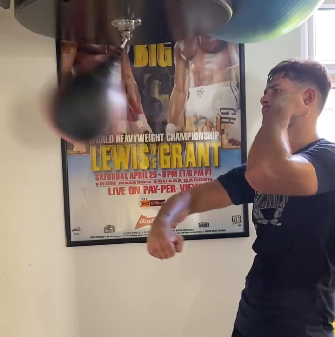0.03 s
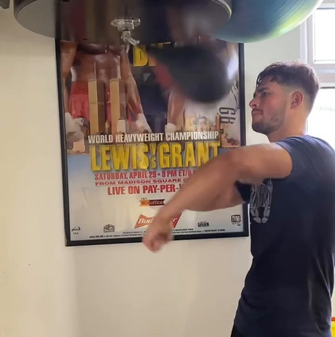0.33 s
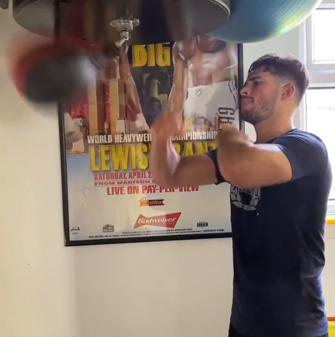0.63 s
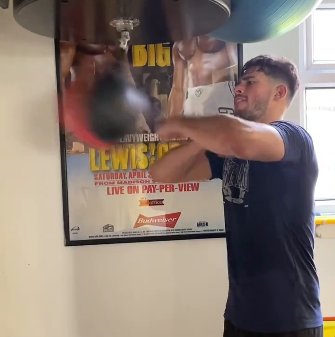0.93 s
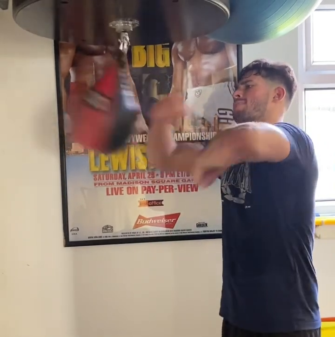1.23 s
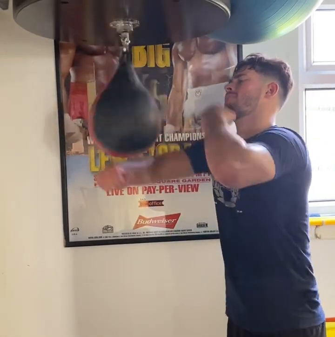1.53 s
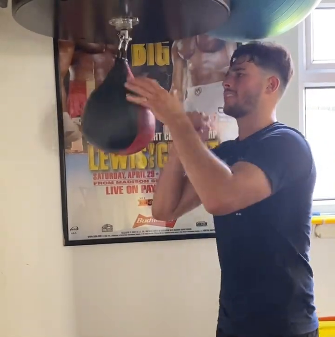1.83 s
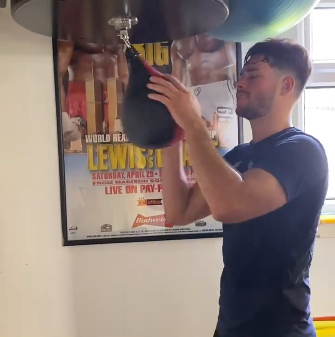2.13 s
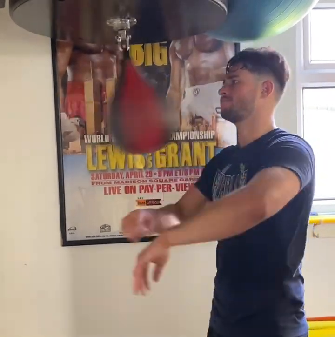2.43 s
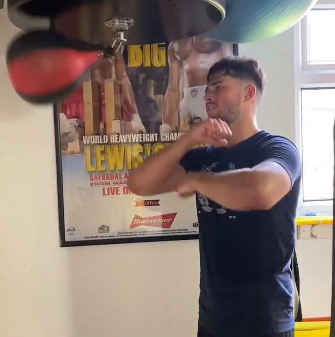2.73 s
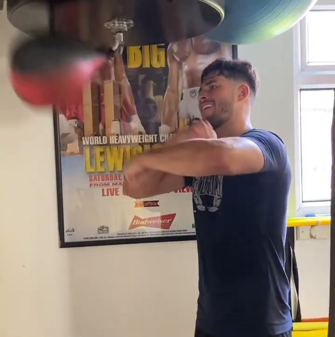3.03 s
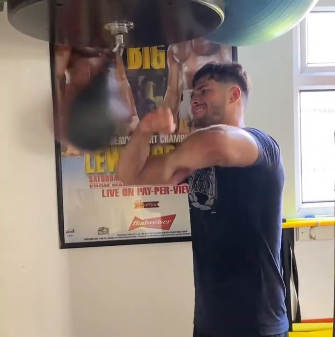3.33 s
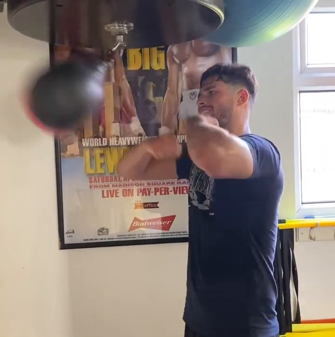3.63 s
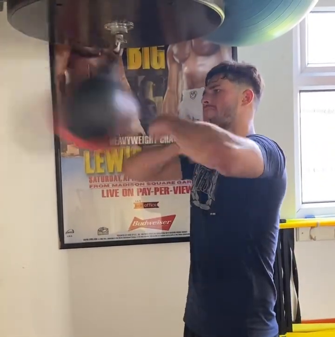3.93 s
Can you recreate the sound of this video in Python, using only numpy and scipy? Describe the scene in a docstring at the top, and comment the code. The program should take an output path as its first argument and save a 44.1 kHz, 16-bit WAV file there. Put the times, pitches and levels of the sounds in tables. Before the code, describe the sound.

A leather speed bag is drummed rapidly, each slap booming on its wooden platform while the metal swivel clatters. Hands steady it with soft thuds, then the drumming resumes, heard up close in a small gym.

```python
"""A leather speed bag is drummed against its wall-mounted platform, steadied by hand, then drummed again.
Each slap is a crack of leather, a woody knock and a thud that sets the board booming. Loose fittings
buzz with every swing of the board; between slaps the swivel clatters and squawks and its shackle rings.
A close pair of microphones hears it all in a small gym."""
import sys
import numpy as np
from scipy import signal
from scipy.fft import rfft, irfft, next_fast_len
from scipy.io import wavfile
from scipy.ndimage import uniform_filter1d

SR = 44100
rng = np.random.default_rng(int(sys.argv[2]) if len(sys.argv) > 2 else 0)


def output_pcm(signal):
    """Save a mono or channel-first signal as 16-bit PCM at the path in sys.argv[1].

    Samples are clipped to [-1, 1] before scaling.
    """
    pcm = np.clip(np.atleast_2d(signal).T, -1, 1) * 32767
    wavfile.write(sys.argv[1], SR, np.round(pcm).astype(np.int16))


N = 176400
TIME = np.arange(N) / SR
FFT_SIZE = next_fast_len(N + SR)
HZ = np.arange(FFT_SIZE // 2 + 1) * SR / FFT_SIZE
MID_ONLY = [[1], [0]]   # two-stream sounds are mid and side until they reach the microphones


def from_db(db):
    """Decibels to gain."""
    return 10 ** (np.asarray(db) / 20)


def unit_rms(x):
    """Scale to an rms of one."""
    return x / np.sqrt(np.mean(x ** 2) + 1e-20)


def at_hz(curve, hz):
    """Read a curve on a log-frequency axis."""
    freqs, values = np.transpose(curve)
    return np.interp(np.log(hz + 1e-9), np.log(freqs), values)


def fader(curve):
    """Gain over time, riding a curve of levels in dB."""
    return from_db(np.interp(TIME, *np.transpose(curve)))


def filtered(x, response):
    """Apply a frequency response."""
    return irfft(rfft(x, FFT_SIZE) * response, FFT_SIZE)[..., :N]


def colour(x, eq):
    """EQ that keeps the power of white noise and rolls off below its first point."""
    gain = from_db(at_hz(eq, HZ)) * np.minimum(HZ / eq[0][0], 1) ** 2
    return filtered(x, unit_rms(gain))


def grains(spread_db):
    """Gritty noise: dense tiny contacts of uneven size, as two streams."""
    sizes = np.clip(rng.standard_normal(N // 32 + 1), -2, 2)
    gain = from_db(spread_db * np.repeat(sizes, 32)[:N])
    return unit_rms(rng.standard_normal((2, N)) * gain)


def bursts(starts_s, levels_db, attack_s, decay_s):
    """Envelope of a run of hits: each rises, then dies away."""
    power, t = np.zeros(N + SR), TIME[:SR // 5]
    for start_s, level_db, rise_s in np.broadcast(starts_s, levels_db, np.maximum(attack_s, 1e-4)):
        shape = np.minimum(t / rise_s, 1) * np.exp(-np.maximum(t - rise_s, 0) / decay_s)
        i = max(int(start_s * SR), 0)
        power[i:i + len(t)] += (from_db(level_db) * shape) ** 2
    return np.sqrt(power[:N])


def pushes(starts_s, levels_db, width_s):
    """Pulses of force, each with its level as area: the wider, the duller."""
    clicks = np.zeros(N + SR)
    clicks[np.maximum(starts_s * SR, 0).astype(int)] = from_db(levels_db)
    return filtered(clicks[:N], np.exp(-2 * (np.pi * HZ * width_s) ** 2))


def ring(force, modes):
    """Resonator bank: a unit click sets each mode ringing at its level."""
    out = 0
    for pitch_hz, level_db, t60_s in modes:
        radius = from_db(-60 / (t60_s * SR))
        pole_real = radius * np.cos(2 * np.pi * pitch_hz / SR)
        tone = signal.lfilter([1, -pole_real], [1, -2 * pole_real, radius ** 2], force + 1e-18)
        out = out + from_db(level_db) * tone
    return out


# Bright crack of the skin: freq_hz, gain_db
CRACK_EQ = [(800, -36), (2000, 5), (3500, 0.5), (5200, 3), (8000, -3), (11000, -3.5), (14000, -8),
            (16000, -31.5)]
# Sharp tick as the leather first touches: freq_hz, gain_db
SNAP_EQ = [(1000, -1), (3000, -32), (6000, 2.5), (10000, 5.5), (13000, -6), (16000, -10.5)]
# Woody midrange knock: freq_hz, gain_db
KNOCK_EQ = [(150, -13.5), (350, 5), (600, 0), (1000, 0.5), (1500, -0.5), (2300, -7), (3500, -10.5),
            (6000, -38), (16000, -55)]
# Leather hits on board or hand: start_s, crack_db, knock_db, thud_db, snap_over_crack_db
SLAPS = [(0.0034, -13.5, -24.5, -23.5, -16), (0.0835, -17.5, -24.5, -19, 14), (0.19, -11.5, -19.5, -17, 7),
         (0.25, -11.5, -20, -14, 14), (0.3574, -11, -23.5, -17, 18.5), (0.4948, -18.5, -25.5, -28, 15),
         (0.599, -15.5, -18, -12, -3), (0.6576, -9, -19, -14, 10), (0.7166, -16, -18.5, -22.5, 11),
         (0.7623, -7.5, -19.5, -10, 14), (0.8649, -10, -19, -12, 6), (0.9772, -11, -20.5, -10.5, 10.5),
         (1.073, -10.5, -17.5, -13.5, 11), (1.1365, -16.5, -19.5, -37, 14), (1.1922, -12, -20.5, -16, -1),
         (1.2967, -10.5, -21, -14, 7), (1.6794, -33.5, -37, -33, 8), (1.9951, -38, -35, -38.5, -9),
         (2.359, -16, -24.5, -16, 8), (2.5155, -20, -29.5, -22, 8), (2.7321, -27.5, -34.5, -28.5, 13.5),
         (2.8566, -25.5, -26, -23, 0), (2.9139, -15, -24, -18.5, 14.5), (3.0336, -10, -23.5, -12.5, 10),
         (3.1486, -10, -17.5, -13, 11), (3.269, -11, -19.5, -11.5, 10), (3.3347, -14.5, -17, -14, -5),
         (3.3865, -9, -17, -10, -7), (3.5065, -6.5, -19, -11.5, 1), (3.5721, -11, -17.5, -20, 6),
         (3.6204, -10.5, -16.5, -10, 13.5), (3.7468, -9, -21, -12.5, 6), (3.8093, -10, -19.5, -17, 11),
         (3.8598, -7.5, -18, -12.5, 5), (3.984, -11, -19.5, -17, 13)]


def leather():
    """The bag's skin snaps on, crackles as it flattens and knocks on the wood."""
    start_s, crack_db, knock_db, _, snap_over_crack_db = np.transpose(SLAPS)
    crack = bursts(start_s, crack_db - 6.5, attack_s=0.00031, decay_s=0.0099) * grains(spread_db=1)
    snap = pushes(start_s + 0.001, crack_db + snap_over_crack_db, width_s=0) * MID_ONLY
    knock = bursts(start_s, knock_db + 3.5, attack_s=0.003, decay_s=0.012) * grains(spread_db=0.5)
    return colour(crack, CRACK_EQ) + colour(snap, SNAP_EQ) + colour(knock, KNOCK_EQ)


# Booming modes of board and bag: pitch_hz, level_db, t60_s
BOARD_MODES = [(39.4, -23, 1), (60.4, -14, 0.72), (69.34, -7.5, 1), (94.3, -8.5, 0.24), (107, -9, .22),
               (139.3, -6, 0.25), (154.4, -7.5, 0.094), (204.6, -11, 0.11), (234.7, -9, 0.2),
               (258, -16, 0.069), (372.4, -17.5, 0.48), (436.6, -9.5, 0.54), (546, -17, 0.084)]
# Low punch under each slap: freq_hz, gain_db
PUNCH_EQ = [(110, -12), (170, 4.5), (250, 3.5), (400, -8.5), (600, -13.5), (1200, -54)]
# Deep rumble of the swaying platform: freq_hz, gain_db
RUMBLE_EQ = [(34, -37), (41, 1), (48, -4), (60, -1), (70, 4), (80, 3.5), (100, 1), (120, -4.5), (145, -5.5),
             (190, -23), (300, -19.5), (600, -75)]
# How hard the board sways, the fader for its rumble and hum: time_s, level_db
SWAY_LEVELS = [(0.0, -3.5), (0.02, -25), (0.18, -16.5), (0.2, -12), (0.48, -27.5), (0.72, -10),
               (1.07, -18.5), (1.16, -11.5), (1.19, -24), (1.32, -18.5), (1.37, -38), (1.96, -51),
               (2.02, -30), (2.27, -74), (2.38, -21.5), (2.78, -46), (2.95, -18), (4.0, -12.5)]


def board():
    """Thuds of the bag and bumps of the swivel set the platform booming; it rumbles as it sways."""
    slap_s, _, _, thud_db, _ = np.transpose(SLAPS)
    clatter_s, _, _, bump_db, _ = np.transpose(CLATTERS)
    load_lag_s = 0.01124   # the bag flattens before the board takes the load
    thuds = pushes(slap_s + load_lag_s, thud_db + 2, width_s=0.0007)
    bumps = pushes(clatter_s + 0.0045, bump_db - 8.5, width_s=0.00086)
    punch_envelope = bursts(slap_s + 0.00773, thud_db - 3, attack_s=0.002, decay_s=0.0079)
    punch = colour(punch_envelope * rng.standard_normal(N), PUNCH_EQ)
    rumble = colour(rng.standard_normal(N), RUMBLE_EQ)
    even_rumble = rumble / np.sqrt(uniform_filter1d(rumble ** 2, size=3000))
    return from_db(-6) * fader(SWAY_LEVELS) * even_rumble + punch - ring(thuds + bumps, BOARD_MODES)


def board_hum(pitch_hz=69.2, wander_hz=2.03):
    """The board's main mode hums on under the drumming, drifting in pitch and following the sway."""
    drift = np.interp(TIME, np.linspace(0, N / SR, 60), rng.standard_normal(60))
    phase = 2 * np.pi * np.cumsum(pitch_hz + wander_hz * drift) / SR
    return from_db(-6.5) * fader(SWAY_LEVELS) * np.sqrt(2) * np.sin(phase)


# Buzz of the loose fittings: freq_hz, gain_db
RATTLE_EQ = [(150, 15.5), (400, 13.5), (700, 8), (1300, 1), (2200, 0.5), (4000, -6), (5300, -18),
             (7500, -24), (11000, -11), (16000, -49)]
# Midrange clack of frame and swivel: freq_hz, gain_db
CLATTER_EQ = [(150, -20), (400, -1), (750, 1), (1300, 2.5), (2000, 1.5), (3200, -3), (6000, -46),
              (16000, -45)]
# How hard the frame shakes, the fader for its rattle: time_s, level_db
SHAKE_LEVELS = [(0.0, -22.5), (0.51, -25.5), (0.61, -25), (0.81, -20), (1.21, -23.5), (1.34, -27),
                (1.44, -36.5), (1.8, -36.5), (1.97, -40), (2.1, -42), (2.34, -52.5), (2.46, -28),
                (2.52, -76), (2.72, -45), (2.86, -34), (3.1, -23.5), (3.2, -24), (4.0, -23.5)]


def fittings(boom, buzz_depth=0.45, clacks_per_s=55):
    """Loose parts buzz at the top of each swing of the board, and clack at random when shaken hard."""
    shake = fader(SHAKE_LEVELS)
    swing = boom / np.sqrt(np.abs(uniform_filter1d(boom ** 2, size=2048)) + 1e-12)
    pulsing = from_db(-10) * unit_rms(np.exp(buzz_depth * np.tanh(swing)))
    spacing, softness = rng.random((400, 2)).T
    start_s = np.cumsum(0.5 + spacing) / clacks_per_s
    level_db = 0.5 - 2 * softness
    heard = start_s < N / SR
    hits = bursts(start_s[heard], level_db[heard], attack_s=0.001, decay_s=0.0047)
    buzz = shake * pulsing * grains(spread_db=3)
    clacks = shake ** 2 / shake.max() * hits * grains(spread_db=-1.5)
    return colour(buzz, RATTLE_EQ) + colour(clacks, CLATTER_EQ)


# Metallic ring of swivel and bracket: pitch_hz, level_db, t60_s
STEEL_MODES = [(879, -6, .3), (1228, -3, .2), (1400, -3, .08), (1586, -4, .12), (1883, -5, .18),
               (2259, -6, .18), (2632, -7, .18), (2916, -8, .3), (3258, -7, .3), (3682, -8, .2),
               (5285, -6, .12), (10500, -14, .3)]


def steel(contacts, relative_db=-17):
    """Swivel and bracket ring faintly along with the contacts that drive them."""
    return from_db(relative_db) * np.std(contacts) * unit_rms(ring(contacts, STEEL_MODES))


# High chime of the shackle: pitch_hz, level_db, t60_s
SHACKLE_MODES = [(2850, -5, .08), (2940, 0, .1), (3260, -1, .08), (3370, -2, .08), (3690, -9, .07),
                 (10130, -7, .05), (10520, -8, .06), (11050, -10, .05)]
# Flicks that set it tapping: start_s, level_db
FLICKS = [(.01, -24.5), (.13, -31), (.29, -46), (.40, -31), (.52, -28), (1.48, -32), (1.602, -43),
          (1.72, -43), (2.070, -43.5), (2.56, -28), (2.61, -32)]


def shackle(taps_per_s=60, spread_db=5):
    """After a flick the shackle taps on for a moment; each mode gets its own taps, so the ring glints."""
    envelope = bursts(*np.transpose(FLICKS), attack_s=0.00082, decay_s=0.045)
    out = 0
    for mode in SHACKLE_MODES:
        taps = rng.random(N) < taps_per_s / SR
        strength = from_db(spread_db * (rng.random(N) - 1))
        out = out + ring(taps * strength * envelope, [mode])
    return out * MID_ONLY


# Bright jingle of the joint: freq_hz, gain_db
JINGLE_EQ = [(1000, -57), (2500, -40), (3800, 13.5), (5200, 11.5), (7000, 3.5), (10500, 0.5), (16000, -12)]
# Swivel and frame clatter as the bag swings through: start_s, jingle_db, clatter_db, bump_db, rise_s
CLATTERS = [(0.122, -18, -26, -7, 0.0036), (0.2148, -7, -14, -46, 0.0077), (0.2894, -45, -39, -23, 0.006),
            (0.3797, -19, -22, -25, 0.0058), (0.525, -21, -31, -32, 0.0073),
            (0.6117, -9, -13.5, -18, 0.0076), (0.731, -11, -22.5, -22, 0.0071),
            (0.7853, -7.5, -17, -27, 0.0037), (0.8252, -8.5, -15, -26, 0.0062),
            (0.8777, -26, -42, -14, 0.0048), (0.9311, -19.5, -18, -5, 0.023),
            (1.033, -17, -18.5, -3, 0.0061), (1.1, -34, -43, -25, 0.006), (1.1605, -19.5, -24, -15, 0.0078),
            (1.255, -14, -17, -17, 0.0094), (1.2726, -24, -48, -21, 0.0054),
            (1.331, -11, -14.5, -28, 0.0042), (1.4048, -23, -25.5, -23, 0.006),
            (1.4375, -23.5, -27, -7.5, 0.0039), (1.478, -21, -24.5, -16.5, 0.0041),
            (1.5813, -29.5, -30.5, -39, 0.0053), (1.6166, -32, -35, -40, 0.0052),
            (1.716, -31.5, -35, -40, 0.0054), (1.7542, -46, -38.5, -37, 0.0046),
            (1.889, -41, -41, -45, 0.0059), (2.0705, -31.5, -32, -30, 0.012),
            (2.284, -36, -30, -57, 0.0076), (2.3287, -24, -33.5, -50, 0.0079),
            (2.4497, -14.5, -20, -29, 0.01), (2.5554, -16, -20.5, -48, 0.007),
            (2.624, -23.5, -27, -37, 0.0047), (2.7776, -21.5, -27, -25, 0.0048),
            (2.985, -28, -23, -23, 0.0058), (3.0031, -21.5, -17, -5, 0.011), (3.0685, -9, -18, -15, 0.0029),
            (3.1, -17.5, -18, -22, 0.0087), (3.2284, -7, -14.5, -6, 0.0031), (3.319, -20, -28, -8, 0.0066),
            (3.3644, -24, -42, -34, 0.006), (3.451, -17, -19, -12, 0.011), (3.5451, -18, -22, -11, 0.0095),
            (3.687, -17.5, -18.5, -3, 0.014), (3.928, -18, -21.5, -6, 0.0045)]


def swivel(lead_s=0.0035, decay_s=0.015):
    """The joint is yanked through its play in a short run of metal contacts."""
    start_s, jingle_db, clatter_db, _, rise_s = np.transpose(CLATTERS)
    moving_s = start_s - lead_s   # the joint starts to move before it hits its stop
    jingle = bursts(moving_s, jingle_db - 14, rise_s, decay_s) * grains(spread_db=1.5)
    clatter = bursts(moving_s, clatter_db - 2, rise_s, decay_s) * grains(spread_db=4)
    return colour(jingle, JINGLE_EQ) + colour(clatter, CLATTER_EQ)


# The dry joint binds and squawks: start_s, pitch_hz, level_db
SQUAWKS = [(0.191, 1260, -11), (0.217, 1263, -13.5), (0.363, 5170, -23), (0.406, 3200, -26.5),
           (.492, 1370, -20.5), (0.597, 777, -15.5), (0.595, 1530, -24.5), (0.613, 1220, -20),
           (1.327, 1690, -14), (1.328, 5110, -18), (1.711, 3170, -34.5), (2.282, 1314, -33),
           (2.452, 1730, -27), (3.340, 1350, -22.5), (3.813, 1290, -20), (3.987, 2010, -23)]


def squawks(width_ratio=0.18):
    """Each brief stick and slip of the joint excites one narrow resonance."""
    out, white = 0, rng.standard_normal((2, N))
    for start_s, pitch_hz, level_db in SQUAWKS:
        edges_hz = [pitch_hz * (1 - width_ratio / 2), pitch_hz * (1 + width_ratio / 2)]
        band = signal.butter(1, edges_hz, "band", fs=SR, output="sos")
        tone = unit_rms(signal.sosfilt(band, signal.sosfilt(band, white)))
        out = out + tone * bursts([start_s], [level_db], attack_s=0.003, decay_s=0.011)
    return out


# Hollow ring of the held bag: pitch_hz, level_db, t60_s
BAG_MODES = [(153.6, -2.5, 0.14), (207, -15, 0.16), (246, -5.5, 0.16), (419, -15, 0.49)]
# Palms catch the bag: start_s, level_db
CATCHES = [(1.690, -20), (1.764, -31), (1.843, -30), (1.998, -18.5), (2.044, -41), (2.744, -19.5)]


def palms():
    """Hands steady the bag with soft pushes that ring it in hollow thuds."""
    return ring(pushes(*np.transpose(CATCHES), width_s=0.001), BAG_MODES)


# Reverb time of the gym, longest in the bass: freq_hz, t60_s
ROOM_DECAY = [(60, 0.94), (250, 0.69), (1000, 0.5), (4000, 0.48), (10000, 0.34), (16000, 0.32)]


def room(send, build_s=0.0012):
    """Diffuse reverb of the gym, each octave dying at its own rate."""
    t, tail = TIME[:SR * 3 // 4], 0
    white = rfft(rng.standard_normal((2, len(t))), FFT_SIZE)
    for centre_hz in 31.25 * 2.0 ** np.arange(10):
        band = np.maximum(1 - np.abs(np.log2((HZ + 1e-9) / centre_hz)), 0)
        octave = irfft(white * band, FFT_SIZE)[:, :len(t)]
        tail = tail + octave * from_db(-60 * t / at_hz(ROOM_DECAY, centre_hz))
    tail = unit_rms(tail * (1 - np.exp(-t / build_s))) / np.sqrt(len(t))
    return filtered(send, rfft(tail, FFT_SIZE))


# Noise floor, sub rumble and thin hiss: freq_hz, gain_db
HUSH_EQ = [(30, 40), (70, -39), (200, -63), (450, -56), (1500, -16), (4000, 16), (16000, 9)]


def hush():
    """A faint, steady bed of noise."""
    return from_db(-63) * colour(rng.standard_normal((2, N)), HUSH_EQ)


# How alike the two microphones sound: freq_hz, likeness_0_to_1
MIC_LIKENESS = [(150, 1), (280, .97), (550, .72), (1100, .35), (3000, .3), (4000, .7), (5500, .84),
                (7300, .93), (8700, .8), (10500, .93), (12000, .8), (13500, .95), (15500, .5)]
# Pan across the spectrum: freq_hz, left_minus_right_db
MIC_BALANCE = [(200, 0), (350, 1.5), (550, 5), (1000, 5), (1550, 4.5), (1800, 0), (3700, 0), (4300, -3),
               (5000, 0), (16000, 0)]
# Phase between the microphones: freq_hz, left_lead_rad
MIC_PHASE = [(200, 0), (700, .5), (950, 2.2), (1100, -1.6), (1650, -1.6), (2100, -.5), (2700, 1.8),
             (3800, .8), (5100, .3), (7000, 3), (7600, 3.2), (9900, 6.1), (11100, 6.5), (13000, 9.3),
             (14200, 9.6), (16000, 12)]


def microphones(streams):
    """A spaced pair: alike in the bass, apart in level and phase higher up."""
    mid, side = rfft(streams, FFT_SIZE)
    alike = np.clip(at_hz(MIC_LIKENESS, HZ), 0, 1)
    left_right = np.array([[1], [-1]])
    pair = np.sqrt((1 + alike) / 2) * mid + left_right * np.sqrt((1 - alike) / 2) * side
    pan = from_db(left_right * at_hz(MIC_BALANCE, HZ) / 2)
    left_lead_rad = np.interp(HZ, *np.transpose(MIC_PHASE))
    return irfft(pair * pan * np.exp(0.5j * left_right * left_lead_rad), FFT_SIZE)[:, :N]


def scene():
    """The mix: the boom sits dead centre, with leather, metal and room spread around it."""
    boom = board() + board_hum() + palms()
    contacts = leather() + swivel() + fittings(boom)
    contacts = contacts + steel(contacts) + squawks() + shackle()
    reverb = room(from_db(-7.5) * (contacts + boom))
    return boom + microphones(contacts + reverb + hush())


def record(dry, low_cut_hz=43, high_cut_hz=16300):
    """Cut the deepest bass, soft-clip the highest peaks and cut the very top."""
    tight = filtered(dry, 1 / np.sqrt(1 + (low_cut_hz / (HZ + 1)) ** 12))
    rounded = tight / (1 + tight ** 6) ** (1 / 6)
    return filtered(rounded, 1 / (1 + (HZ / high_cut_hz) ** 120))


dry = scene()
out = record(dry)
output_pcm(out)
```